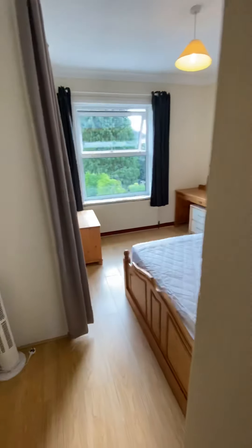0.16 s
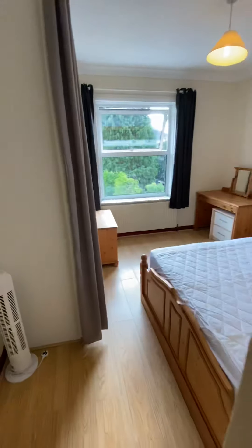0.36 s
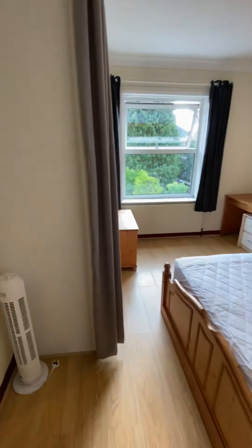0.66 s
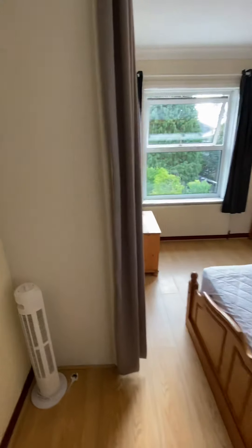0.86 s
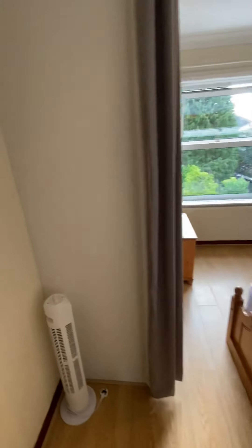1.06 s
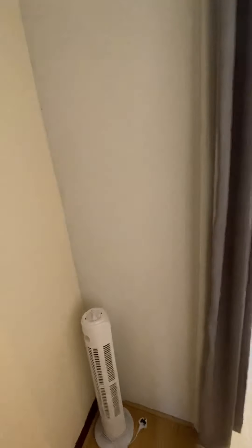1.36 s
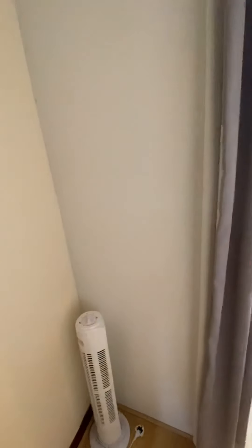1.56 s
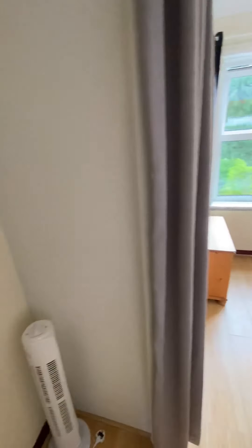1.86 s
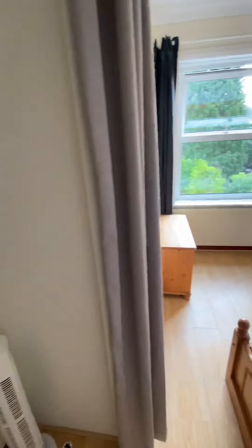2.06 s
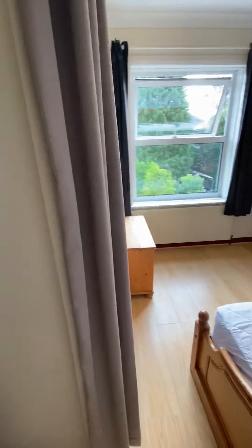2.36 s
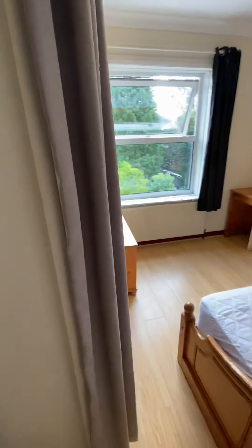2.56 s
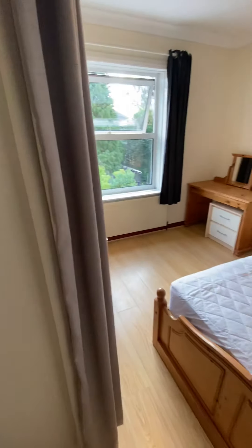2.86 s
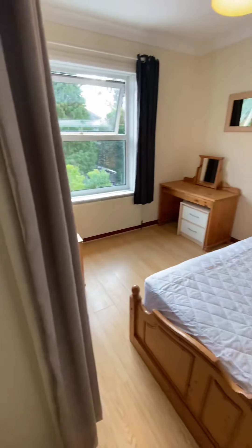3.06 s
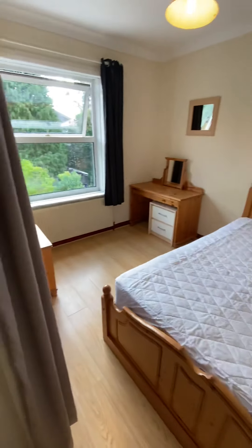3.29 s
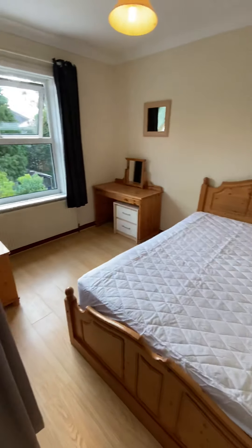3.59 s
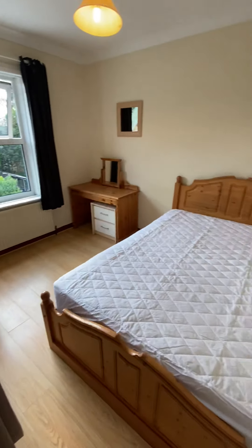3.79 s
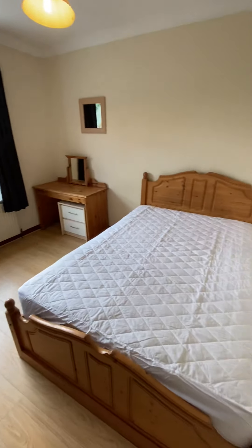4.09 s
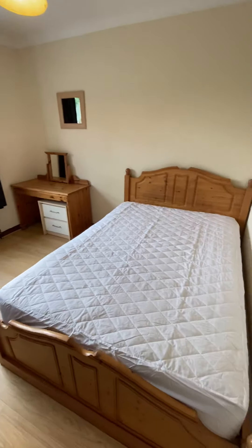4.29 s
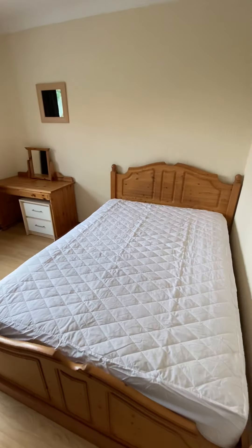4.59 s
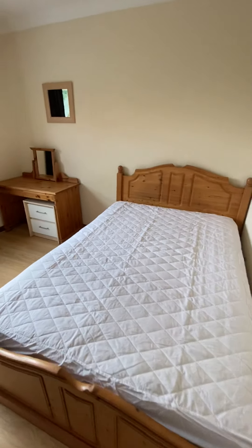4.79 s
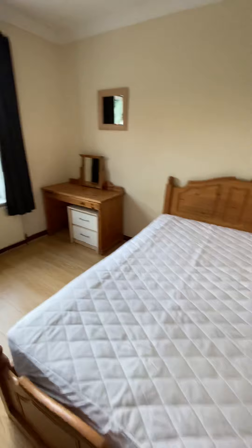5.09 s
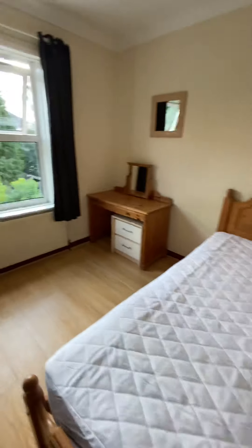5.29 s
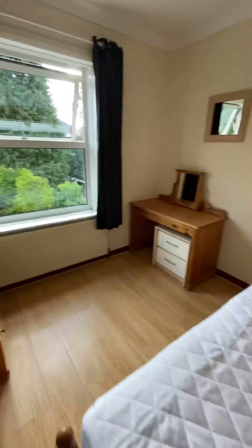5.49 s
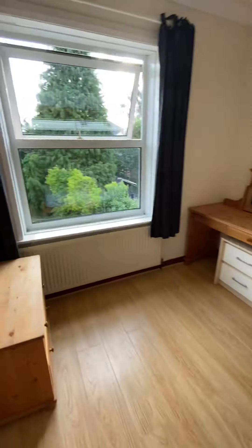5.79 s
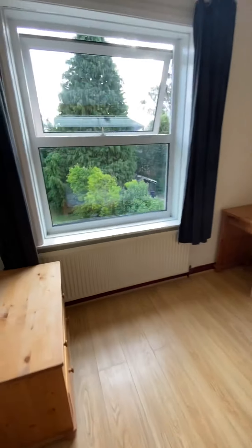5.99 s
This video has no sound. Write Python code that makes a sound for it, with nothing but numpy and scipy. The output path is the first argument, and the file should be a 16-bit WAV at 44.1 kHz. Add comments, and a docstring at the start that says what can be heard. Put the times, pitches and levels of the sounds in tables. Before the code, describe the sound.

A person walks slowly on hard laminate in a small, bare bedroom, heard by a handheld stereo microphone. A very faint low murmur of house and street lies beneath. Soft cloth rustle and tiny ticks open; at 0.5 to 0.6 s a dull hollow knock lands, with a scuff and brushing cloth until about 1 s. A strong, sharper heel blow comes at 1.15 s, then another step at 1.8 s. At 2.0 s a rubber sole gives a very short squeak and drags with a sinking groan, followed by a low thump at 2.25 s and a lighter one at 2.5 s. A double knock falls near 3.2 s. From about 3.3 to 4.7 s it is almost silent. Small shifts at 4.8 s lead to a loud firm step at 5.07 to 5.2 s, then a boomy step at 5.7 to 5.8 s and a last bright tick near 6.06 s. Each blow has a short, roomy tail.

```python
"""Footsteps in a bare bedroom

Someone walks slowly about on floating laminate, stops for a while, then walks on.
Heel and toe blows ring the floor as fading sine waves; sharp clicks tick on the planks.
Sliding soles and brushing cloth are shaped hiss; one sole squeaks in overtones, then drags with a groan.
The small room adds a short noise-like tail, over the low coloured-noise murmur of house and street."""
import sys
import numpy as np
from scipy import signal
from scipy.fft import rfft, irfft, next_fast_len
from scipy.io import wavfile
from scipy.ndimage import uniform_filter1d

SR = 44100
rng = np.random.default_rng(int(sys.argv[2]) if len(sys.argv) > 2 else 0)


def generate_wav(sig):
    """Save sig (samples, or channels by samples) to the path in sys.argv[1] as 16-bit PCM at SR."""
    pcm = np.round(np.clip(np.atleast_2d(sig).T, -1, 1) * 32767).astype(np.int16)
    wavfile.write(sys.argv[1], SR, pcm)


N = 270979

# murmur of house and street, colour before scaling: (f/Hz, level/dB per Hz)
HOUSE_COLOUR = [(18, -38), (30, -9.5), (53, -1), (76, -14.5), (153, -11), (182, -22.5), (212, -13),
                (253, -21.5), (286, -15), (317, -31.5), (550, -46), (930, -28.5), (1830, -53.5),
                (4290, -47.5), (12000, -55.5), (15600, -114), (22000, -120)]
HOUSE_DB = -57
# boards creeping under shifting weight: (t/s, joist level/dB, board level/dB)
FLOOR_SWAY = [(0, -59, -63), (.2, -80, -70.5), (.48, -78, -64.5), (.7, -57, -56.5), (.94, -57, -60.5),
              (1.67, -51, -58), (1.81, -62, -61.5), (2.02, -59, -56.5), (2.5, -61.5, -60.5),
              (2.901, -59.5, -72), (3.23, -55, -65.5), (3.56, -74, -75), (4.5, -78.5, -68),
              (4.86, -73, -70), (5.15, -44, -50), (5.27, -44, -60), (5.65, -67.5, -67), (5.86, -40, -56.5),
              (6.14, -53, -58.5)]
# a sole lands and slides: (t/s, level/dB, slide/s, time to fade 20 dB/s,
# top range against the level/dB, lower rasp against the level/dB)
SOLE_SCUFFS = [(0, -53.5, 0.0033, 0.0752, -5, -4.5), (.262, -71, 0, 0, -0.5, 2),
               (0.468, -54, 0.0036, 0.08, -10.5, 0.5), (0.57, -50.5, 0.0022, 0.05, -8.5, -0.5),
               (0.723, -54.5, 0.0054, 0.05, -8, -8), (1.158, -48, 0.048, 0.13, -8.5, -3),
               (1.349, -58.5, 0.0089, .05, -15, -4), (1.788, -57.5, 0.0048, 0.25, -5.5, 6.5),
               (1.827, -54.5, 0, 0.05, -20, 10), (1.981, -47.5, 0.013, 0.09, -14.5, 4.5),
               (2.04, -61.5, 0.0042, 0.11, -15, 10.5), (2.207, -60.5, 0.0099, 0.04, -10, 4.5),
               (2.266, -46, 0.0082, 0.0739, -7.5, -2), (2.478, -63, 0.025, 0.16, -7, 3.5),
               (2.533, -50, 0, 0.1, -8, -7), (3.04, -55, 0.047, 0.05, -5.5, -3.5),
               (4.822, -60, 0.0088, 0.11, -6.5, -8), (5.005, -56, 0, 0.17, -10, -9),
               (5.073, -51, 0, 0.1347, -18.5, 5), (5.177, -54, 0, 0.19, -4.5, -4),
               (5.683, -50.5, 0.004, 0.19, -4.5, 2.5), (5.789, -55, 0, 0.22, -11, 0),
               (6.059, -64, 0.031, .2, 9.5, -2)]
# cloth brushes as a leg swings: (t at full level/s, level/dB, hold/s, time to fade 20 dB/s,
# top range against the level/dB, rasp against the level/dB, time to rise 20 dB/s); short times are raised below
CLOTH_BRUSHES = [(.05, -66, 0.024, 0.27, -8, 0.5, 2), (.46, -62.5, 0.017, -0.2, -4.5, -3, 0.09),
                 (.62, -64.5, 0, 0.6, -11, -2.5, 0.6), (0.778, -59.5, 0.21, 0.22, -3, -6.5, 0.13),
                 (1.143, -68, .01, 0.3, -9, 2.5, 0.3), (1.563, -66, 0, 0.5, -10.5, 0.5, 0.8),
                 (1.773, -70, 0.067, -1.2, -8, 5.5, -0.3), (2.145, -75, .05, 0.5, -15, 7.5, 0.3),
                 (2.47, -70, 0.064, 0.26, -11, -2.5, 1), (2.582, -61, 0.081, 0.18, -6, -2, -0.02),
                 (4.48, -73, 0.065, -0.26, -7, -8, 0.03), (4.99, -74, 0, 0.5, -7, 0, 0.75),
                 (5.352, -64, 0.0023, 0.1, -5.5, -5, 0.05), (5.443, -69.5, 0, 0.3, -5.5, -4, 0.4),
                 (5.88, -75, 0.15, 3, 4.5, -12, -0.05)]
# colour of the sliding hiss before its ranges are levelled: (f/Hz, level/dB per Hz)
SOLE_COLOUR = [(650, -32), (1100, 4.5), (1430, -11.5), (1830, -11.5), (1990, -9.5), (2190, -8.5),
               (2960, -6), (3550, -1), (4740, -3.5), (5340, -1), (7820, -11), (8550, -14.5), (9360, -12.5),
               (10600, -17), (12000, -30), (15600, -76), (22000, -120)]
SCUFF_RISE_S = 0.0089  # to rise 20 dB
SHORTEST_RISE_S, SHORTEST_FADE_S = 0.002, 0.05  # for a change of 20 dB
# the sole drags on after the squeak, its groan sinking as it slows: (t/s, centre f/Hz, level/dB)
SOLE_DRAG = [(1.99, 900, -73.5), (2.02, 850, -48), (2.1, 780, -57.5), (2.19, 497.4, -56), (2.25, 442, -66)]
DRAG_ROUGHNESS_HZ = 220  # how often the random slips change; faster means a wider band
# rubber squeaking as a sole twists: (t/s, slip rate f/Hz before a small wobble, level/dB)
SOLE_SQUEAK = [(1.977, 883, -48), (1.986, 871, -38.5), (1.996, 870, -43.5), (2.02, 868, -54)]
# overtones of the squeak against each other: (multiple of the slip rate, level/dB)
SQUEAK_OVERTONES = [(1, 1.5), (2, -1), (3, 3), (4, 1), (5, -3.5), (6, -6)]
# heel-edge, grit and sole ticks: (t/s, click peak level/dB, centre f/Hz)
SOLE_TICKS = [(0.1277, -51.5, 5940), (0.2619, -52.5, 5000), (0.5691, -31, 2820), (0.6295, -50, 6900),
              (0.673, -47, 2620), (0.7228, -38, 3970), (1.1548, -26, 1980), (1.156, -24, 690),
              (1.3463, -41, 3670), (1.786, -36, 1490), (1.826, -31, 2200), (2.202, -46, 2170),
              (2.2608, -40, 5470), (2.53, -42, 5160), (3.043, -53, 4270), (3.172, -36.5, 1680),
              (3.231, -41, 800), (3.641, -56, 4310), (4.7575, -48, 3940), (5.0724, -25, 2320),
              (5.0735, -23, 690), (5.076, -40, 5100), (5.1772, -29, 3270), (5.432, -46, 6600),
              (5.681, -32, 2500), (5.682, -31, 590), (5.7405, -41, 6060), (5.79, -49, 5400),
              (5.801, -38, 2820), (5.8543, -35, 2850), (5.8552, -47, 5570), (6.0574, -32.5, 7240)]
TICK_GRIT_DB, TICK_T60_S = -9.5, 0.019  # crumbling against the click; time to fade 60 dB
# heel and toe blows: (t/s, plank knock level at 500 Hz/dB, hardness/dB per octave, joist boom level/dB,
# board boom level/dB, sole crack level/dB, share of the full ring time, contact/ms)
FOOT_BLOWS = [(0.463, -42.5, 1, -63, -32.5, -69, 0.75, 2.1), (0.57, -40, -0.5, -33, -25.5, -52, 0.57, 0.96),
              (0.812, -51.5, -1, -56, -40, -49, 0.84, 1.6),
              (1.155, -27.5, 3.5, -24.5, -26, -29.5, 0.59, 0.76),
              (1.234, -45.5, -8.5, -29.5, -33.5, -51, 0.71, 0.49),
              (1.784, -29.5, 4, -38, -53, -36.5, 0.49, 3.9),
              (1.824, -44.5, 14.5, -29.5, -46, -37, 0.66, 1.8), (1.982, -40, 2, -41, -63, -27, 0.63, 7.3),
              (2.05, -51, 12, -64, -63, -48, 0.82, 2.5), (2.176, -48.5, -4.5, -47, -48.5, -65, 0.99, 1.5),
              (2.234, -65, -1, -54, -52, -46, 0.44, 1.3), (2.26, -47.5, -2.5, -23, -34.5, -35, 0.38, 2.9),
              (2.478, -39, 2, -68, -35, -41, 0.62, 1.3), (2.683, -68, -8, -33.5, -95, -69, 0.5, 1.3),
              (3.041, -48.5, -2, -71, -34.5, -69, 0.75, 1.2), (3.171, -39, 8, -62, -28.5, -41, 0.62, 1.1),
              (3.185, -31, -3.5, -33, -38.5, -46, 0.38, 0.71), (3.231, -53, 7, -58, -53, -67, 0.37, 0.73),
              (3.813, -82, -3, -40, -64, -71, 0.53, 1.7), (4.823, -51, -2.5, -40, -54, -46, 0.91, 1.5),
              (5.004, -50, -4, -43, -44, -77.5, 0.98, 2.6), (5.073, -27, 1, -29, -20, -33, 0.4, 0.69),
              (5.104, -34.5, 0, -45, -24, -66, 0.64, 0.77),
              (5.176, -44, -4.5, -27, -35.5, -54.5, 0.77, 1.2),
              (5.225, -64.5, -19, -39, -56, -69, 0.8, 1.5), (5.679, -37, -5, -48, -32.5, -42.5, 0.45, 0.21),
              (5.706, -43.5, -7, -30, -35.5, -71, 0.96, 1.6), (5.794, -39, -5.5, -20, -38, -39, 0.43, 1.7),
              (5.815, -49, -11, -32, -36, -64, 1, 2.7)]
# where a blow's six levels apply, joist boom to sole crack: (f/Hz)
BLOW_POINTS_HZ = [55, 140, 280, 500, 900, 2500]
# what the floor rings with: (f/Hz, level against the blow/dB, full time to fade 60 dB/s)
FLOOR_MODES = [(46.5, -2, 0.37), (59, -4, 0.2), (81.6, -7.5, 0.51), (107.4, -2, 0.39), (124.5, -6, 0.37),
               (142.75, 4, 0.28), (172.3, -1.5, 0.47), (215.5, -4.5, 0.29), (266.5, -0.5, 0.21),
               (298.3, -4, 0.25), (344.8, -6, 0.25), (417.8, -4, 0.14), (441.6, -3, 0.24),
               (492.2, -1.5, 0.14), (560.5, -7.5, 0.27), (611.4, -2, 0.14), (709.4, -2, 0.11),
               (796, -6.5, 0.15), (897, -5, 0.079), (1009, -9.5, .12), (1103, -5.5, 0.041),
               (1259, -5, 0.043), (1424, -16, 0.036), (1630, -10, 0.014), (1963, -7.5, 0.036),
               (2200, -12, 0.018), (2664, -10, 0.03)]
RISE_CYCLES = 0.21  # build-up time of a mode, in cycles of its tone
SPOT_DB = 2.5  # random spread of mode levels from spot to spot
TRAVEL_S, HEAD_START_S = 0.0079, 0.00206  # travel time of 140 Hz bending waves; taken off all travel times
FREE_RING_S, SETTLE_S, SETTLE_DB = 0.039, 0.0049, -4  # when, how gradually and how far the foot mutes
# range of the crack: (lower f/Hz, upper f/Hz)
CRACK_RANGE_HZ = (800, 3600)
CRACK_DB, CRACK_T60_S = -5.5, 0.12  # added to each blow's crack level; full time to fade 60 dB
# how long the room's tail rings: (f/Hz, time to fade 60 dB/s)
TAIL_T60 = [(60, 0.76), (250, 0.52), (1000, 0.25), (4000, 0.28), (10000, 0.062)]
# how strong the tail is against the direct sound: (f/Hz, level/dB)
TAIL_DB = [(60, -13.5), (250, -7), (1000, 2), (4000, -4.5)]
PORT_LAG_S = 0.00014
# how alike left and right are in diffuse sound: (f/Hz, likeness from -1 to 1)
LEFT_RIGHT_ALIKE = [(60, 0.92), (150, 0.94), (300, 0.85), (600, -0.24), (1200, -0.18), (2600, -0.38),
                    (5500, 0.44), (11000, -0.7)]
# how the two ports differ: (f/Hz, left minus right level/dB)
PORT_DIFFERENCE = [(60, 0.5), (110, 1), (190, 0.5), (350, 1.5), (620, 1.5), (1120, 2.0), (2000, 1),
                   (3590, -2), (6450, -0.5), (11600, 1.5)]
NOTCH_HZ, NOTCH_WIDTH_HZ = 4734, 265
TOP_HZ = 12177


def undb(db):
    """Gain of a level in dB."""
    return 10 ** (np.asarray(db) / 20)


def along(table, hz):
    """Value of a (Hz, value) table on a log-frequency axis."""
    points = np.array(table, float)
    return np.interp(np.log(np.maximum(hz, 1)), np.log(points[:, 0]), points[:, 1])


def band(x, lo_hz, hi_hz):
    """Keep only the sound between two frequencies (band-pass)."""
    sos = signal.butter(2, [lo_hz, min(hi_hz, .45 * SR)], "band", fs=SR, output="sos")
    return signal.sosfilt(sos, x)


def split(x, edges_hz):
    """Bands between the edges, cross-faded over a third of an octave so that they add up without dips."""
    size = x.shape[-1]
    fast = next_fast_len(size)
    octave = np.log2(np.fft.rfftfreq(fast, 1 / SR) + 1e-9)
    spectrum = rfft(x, fast)
    above = [np.clip(.5 + 3 * (octave - np.log2(edge)), 0, 1) for edge in edges_hz]
    return [irfft(spectrum * (a - b), fast)[..., :size] for a, b in zip(above, above[1:])]


def unit(x):
    """Scaled to rms 1."""
    return x / x.std()


def hiss(size, colour=((1, 0), (SR, 0))):
    """Two channels of coloured noise, as alike as the likeness table says at each frequency; rms 1."""
    fast = next_fast_len(size)
    hz = np.fft.rfftfreq(fast, 1 / SR)
    alike = np.clip(along(LEFT_RIGHT_ALIKE, hz), -1, 1)
    noise = rfft(rng.standard_normal((2, fast))) * undb(along(colour, hz))
    mid, side = noise * np.sqrt([1 + alike, 1 - alike])
    pair = irfft(np.array([mid + side, mid - side]), fast)[:, :size]
    return unit(pair)


def walk(rate):
    """Random levels, each held 1 / rate s, then smoothed into one another; spread near 1."""
    k = int(SR / rate)
    steps = np.repeat(rng.standard_normal(N // k + 1), k)
    return 1.4 * uniform_filter1d(uniform_filter1d(steps, k), k)[:N]


def add(out, s, sound):
    """Mix a sound in at time s."""
    i = int(s * SR)
    out[:, i:i + sound.shape[-1]] += sound[..., :N - i]


def house():
    """Murmur of house and street: octave bands of noise swell together and flicker alone."""
    swell = walk(2.78)
    octaves = split(hiss(N, HOUSE_COLOUR), 20 * 2. ** np.arange(11))
    murmur = sum(b * undb(0.44 * swell + 2.3 * walk(20.97)) for b in octaves)
    return unit(murmur) * undb(HOUSE_DB)


def sway():
    """The loaded floor trembles between blows: a low joist band and a higher board band of noise."""
    s, joist_db, board_db = np.transpose(FLOOR_SWAY)
    t = np.arange(N) / SR
    push = hiss(N)
    joists = unit(band(push, 46.6, 61.0)) * undb(np.interp(t, s, joist_db) + 1.6 * walk(22))
    boards = unit(band(push, 200, 857)) * undb(np.interp(t, s, board_db) + 2.55 * walk(12))
    return joists + boards


def scuffs():
    """Stick-slip of rubber on the planks and brushing cloth: hiss of uneven grain, in three ranges."""
    t = np.arange(N) / SR
    power = np.zeros((3, N))  # rasp, middle, top
    slides = [(*row, SCUFF_RISE_S) for row in SOLE_SCUFFS]
    for s, db, hold_s, fade_s, top_db, rasp_db, rise_s in slides + CLOTH_BRUSHES:
        near = slice(max(int((s - 1.5) * SR), 0), int((s + 1.5) * SR))
        since = t[near] - s
        rise_db = -20 * np.maximum(-since / max(rise_s, SHORTEST_RISE_S), 0)
        fade_db = -20 * np.maximum((since - hold_s) / max(fade_s, SHORTEST_FADE_S), 0)
        range_gain = undb([[rasp_db], [0], [top_db]])
        power[:, near] += undb(db + rise_db + fade_db) ** 2 * range_gain ** 2
    grains = hiss(N, SOLE_COLOUR) * undb(1.5 * walk(150))
    ranges = split(grains, [1300, 3000, 7000, 14000])
    return sum(unit(r) * undb(1.2 * walk(40)) * np.sqrt(p) for r, p in zip(ranges, power))


def drag():
    """Irregular slips of the sole: a narrow rough band that glides down."""
    s, hz, db = np.transpose(SOLE_DRAG)
    t = np.arange(N) / SR
    phase = 2 * np.pi * np.cumsum(np.interp(t, s, hz)) / SR
    # random swings of a sine and a cosine spread the tone into a band, separately left and right
    slips = [walk(DRAG_ROUGHNESS_HZ) * np.cos(phase) + walk(DRAG_ROUGHNESS_HZ) * np.sin(phase)
             for port in "LR"]
    return unit(np.array(slips)) * undb(np.interp(t, s, db, left=-120, right=-120))


def squeak():
    """Regular slips of the rubber give a short stack of overtones that wobbles a little."""
    s, slip_hz, db = np.transpose(SOLE_SQUEAK)
    t = np.arange(N) / SR
    wobbly_hz = np.interp(t, s, slip_hz) * (1 + .014 * walk(400))
    phase = 2 * np.pi * np.cumsum(wobbly_hz) / SR
    stack = sum(undb(order_db + 4 * walk(150)) * np.sin(k * phase) for k, order_db in SQUEAK_OVERTONES)
    mono = unit(stack) * undb(np.interp(t, s, db, left=-120, right=-120))
    return np.tile(mono, (2, 1))


def ticks():
    """A hard edge or a grain snaps on the plank: one sharp broad click with a little crumbling after it."""
    out = np.zeros((2, N))
    t = np.arange(SR // 10) / SR
    for s, peak_db, hz in SOLE_TICKS:
        click = band(1. * (t == 0), hz / 1.36, hz * 1.46)
        crumble = unit(band(hiss(len(t)), hz / 1.36, hz * 1.48))
        grit = crumble * undb(TICK_GRIT_DB - 60 * t / TICK_T60_S)
        add(out, s, (click / np.abs(click).max() + grit) * undb(peak_db))
    return out


def blows():
    """Every blow rings the floor modes, varied as by its spot; low modes build up slowly, so boom comes late."""
    out = np.zeros((2, N))
    t = np.arange(SR // 3) / SR
    hz, mode_db, t60 = (column[:, None] for column in np.transpose(FLOOR_MODES))
    # bending waves in the boards are slower the lower they are
    delay = np.maximum(TRAVEL_S * np.sqrt(140 / hz) - HEAD_START_S, 0)
    since = np.maximum(t - delay, 0)
    build_up = 1 - np.exp(-since * hz / RISE_CYCLES)
    # long waves start alike wherever the foot lands, short ones do not
    scatter = np.minimum(hz / 500, 1)
    # the foot settles and mutes the plank
    mute = undb(SETTLE_DB * (1 + np.tanh((t - FREE_RING_S) / SETTLE_S)) / 2)
    for s, knock_db, hardness, joist_db, board_db, crack_db, ring, contact_ms in FOOT_BLOWS:
        knocks_db = knock_db + hardness * np.log2(np.array(BLOW_POINTS_HZ[2:5]) / 500)
        part_db = [joist_db, board_db, *knocks_db, crack_db]
        level_spot, pitch_spot, phase_spot = rng.standard_normal((3, len(FLOOR_MODES), 1))
        db = mode_db + along(list(zip(BLOW_POINTS_HZ, part_db)), hz) + SPOT_DB * level_spot
        ring = max(ring, .1)
        # the force rises with a time constant of half the contact time
        push = (1 - np.exp(-2000 * since / max(contact_ms, .1))) ** 2
        shape = push * build_up * undb(-60 * since / (t60 * ring))
        mode_hz = hz * (1 + 0.032 * scatter * pitch_spot)
        tones = np.sin(2 * np.pi * mode_hz * since + 1.62 * scatter * phase_spot)
        modes = np.sum(undb(db) * shape * tones, axis=0) * mute
        # the dense upper modes of plank and sole merge into a short crack
        noise = rng.standard_normal(len(t))
        for _ in range(3):  # steeper edges with each pass
            noise = band(noise, *CRACK_RANGE_HZ)
        crack = push[-1] * unit(noise) * undb(crack_db + CRACK_DB - 60 * t / (CRACK_T60_S * ring))
        add(out, s, modes + crack)
    return out


def room(dry):
    """Direct sound, a little late at the second port, plus a diffuse tail whose bass rings longest."""
    t = np.arange(int(.6 * SR)) / SR
    edges = 30 * 2. ** np.arange(10)
    tail = 0
    for hz, diffuse in zip(np.sqrt(2) * edges, split(hiss(len(t)), edges)):
        fade = undb(-60 * t / along(TAIL_T60, hz)) * (1 - np.exp(-t / 0.0041))
        tail = tail + diffuse * fade / np.sqrt(np.sum(fade ** 2)) * undb(along(TAIL_DB, hz))
    late = np.interp(np.arange(N) - PORT_LAG_S * SR, np.arange(N), dry[1])
    direct = np.array([dry[0], late])
    mono = dry.mean(axis=0, keepdims=True)
    return direct + signal.fftconvolve(mono, tail, axes=1)[:, :N]


def scene():
    """Blows and ticks ring the room; squeak and drag stay close; slides, sway and murmur are already diffuse."""
    background = house() + sway()
    soles = scuffs() + drag() + squeak()
    return background + soles + room(ticks() + blows())


def record(dry):
    """The two ports differ a little, one narrow band near 4.7 kHz is weakened; bass and top are cut."""
    fast = next_fast_len(N)
    tilt_db = along(PORT_DIFFERENCE, np.fft.rfftfreq(fast, 1 / SR)) / 2
    ports = irfft(rfft(dry, fast) * undb([tilt_db, -tilt_db]), fast)[:, :N]
    notched = signal.lfilter(*signal.iirnotch(NOTCH_HZ, NOTCH_HZ / NOTCH_WIDTH_HZ, SR), ports)
    low_cut = signal.sosfilt(signal.butter(5, 39, "high", fs=SR, output="sos"), notched)
    soft = signal.sosfilt(signal.butter(4, 10800, fs=SR, output="sos"), low_cut)
    return signal.sosfilt(signal.ellip(8, .2, 70, TOP_HZ, fs=SR, output="sos"), soft)


dry = scene()
out = record(dry)
generate_wav(out)
```